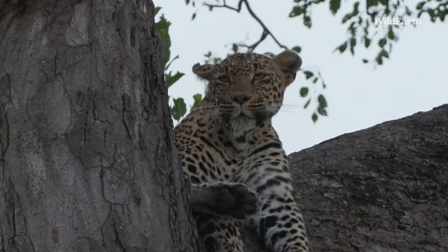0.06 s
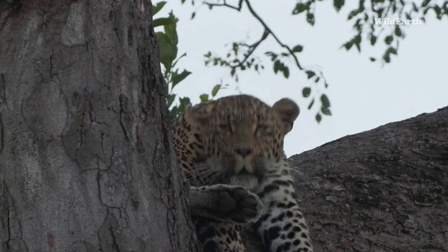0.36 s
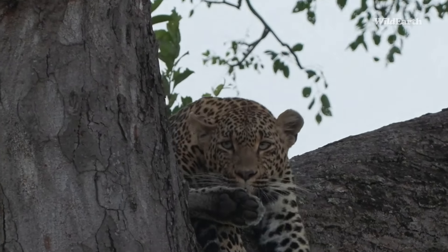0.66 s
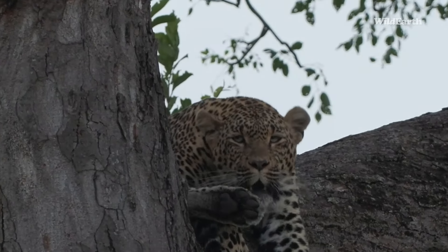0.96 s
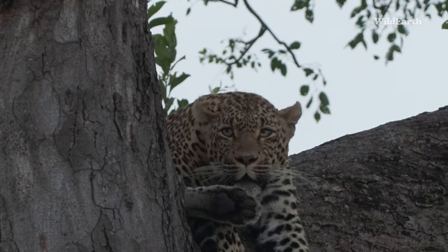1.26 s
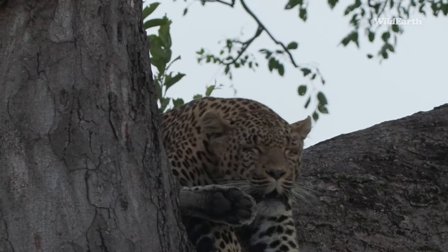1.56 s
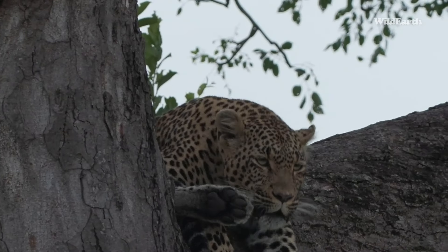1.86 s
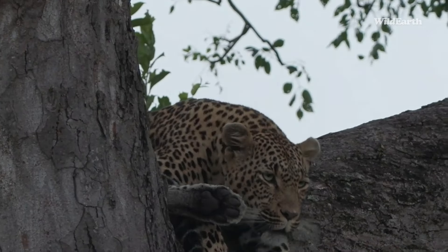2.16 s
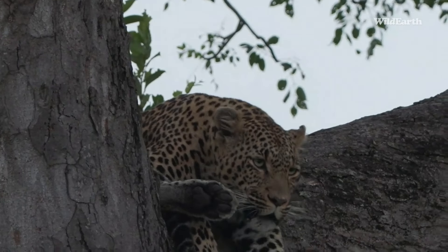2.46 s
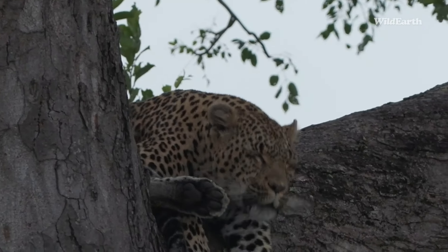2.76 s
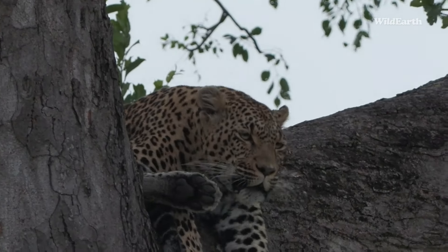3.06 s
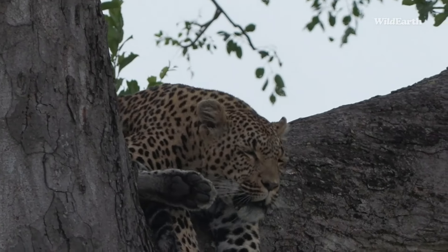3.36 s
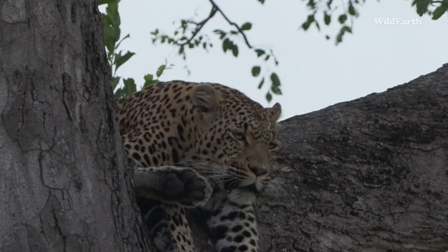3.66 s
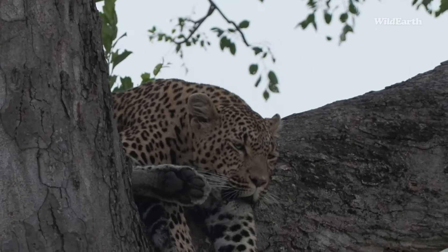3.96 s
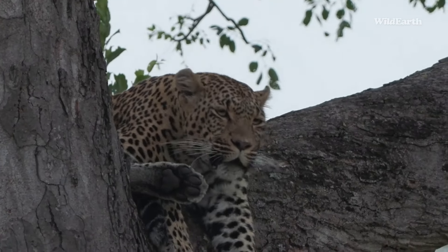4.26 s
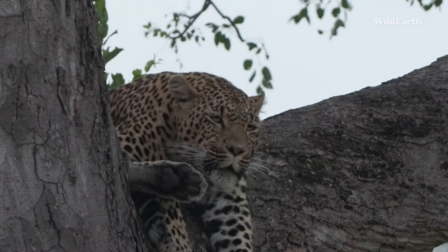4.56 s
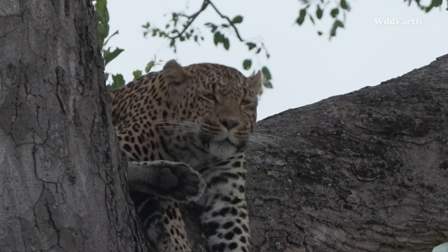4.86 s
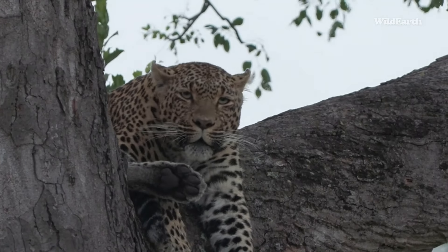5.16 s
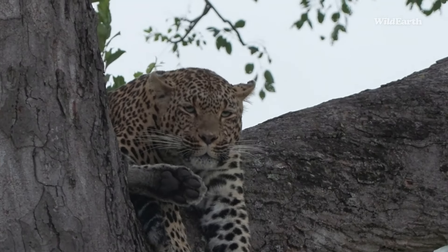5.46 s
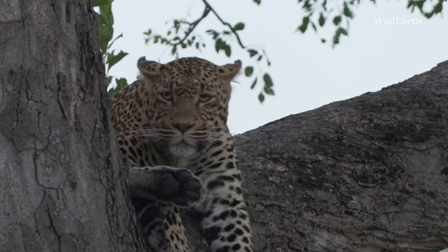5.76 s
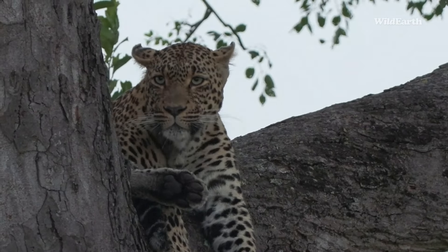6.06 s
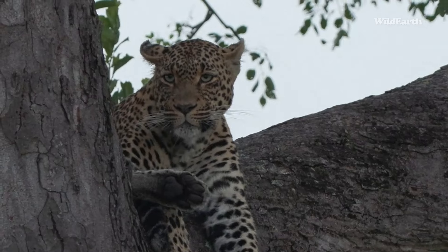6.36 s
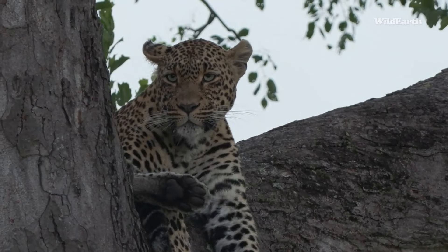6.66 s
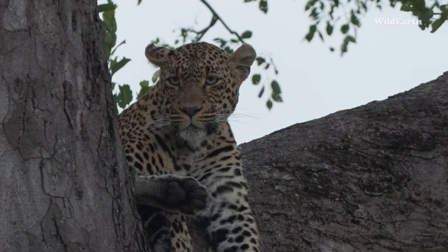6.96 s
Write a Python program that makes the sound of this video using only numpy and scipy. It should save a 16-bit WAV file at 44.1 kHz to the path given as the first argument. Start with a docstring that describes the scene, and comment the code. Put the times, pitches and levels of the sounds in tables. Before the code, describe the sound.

A leopard calls with harsh, sawing grunts and rasping in-breaths, then stops, leaving faint birds and twig ticks.

```python
"""A few twigs tick, then a leopard saws from a tree: harsh outward grunts alternate with softer inward rasps.
Its slack vocal folds flap some 20-60 times a second; each flap rings the throat and frees a puff of air.
As the effort peaks the ring sustains itself and overloads the microphone; a far bird starts to trill.
A weak last grunt ends before 6 s, leaving faint birds and twig ticks in the open-air hush."""
import sys
import numpy as np
from scipy import signal
from scipy.fft import rfft, irfft
from scipy.io import wavfile
from scipy.ndimage import uniform_filter1d, map_coordinates

SR = 44100
rng = np.random.default_rng(int(sys.argv[2]) if len(sys.argv) > 2 else 0)


def file_out(sig):
    """Save sig as 16-bit WAV at sys.argv[1]."""
    # one column per channel
    cols = np.atleast_2d(sig).T
    # limit, then scale
    lim = np.clip(cols, -1, 1)
    pcm = np.round(lim * 32767).astype(np.int16)
    wavfile.write(sys.argv[1], SR, pcm)


N = 309582


def leopard():
    """Flow-induced vibration: breath drives the vocal folds outward and inward in turn."""
    # exhalations: start_s, end_s, crest_after_s, strength_db, onset_softness, swell_db_per_s,
    # release_db_per_s, ring_hz, sustain_share, start_flap_hz, crest_flap_hz, release_flap_hz
    out_strokes = [(.346, .647, .06, -24.5, .45, 30, 124, 222, .39, 38.5, 41.5, 36),
                   (.902, 1.224, .153, -8, .42, 66, 315, 252, .98, 52, 47, 23.5),
                   (1.495, 1.797, .146, 0, .62, 6, 272, 242, .97, 50, 57, 32.5),
                   (2.102, 2.395, .138, -1.8, 1.05, 26, 290, 246, .66, 48, 53, 37),
                   (2.703, 3.009, .145, .6, 1.25, 22, 305, 243, .72, 41, 59, 32.5),
                   (3.33, 3.626, .138, .5, .78, 8, 305, 242, .97, 44, 61, 31),
                   (3.99, 4.295, .126, .7, .95, 26, 305, 228, .85, 39, 56, 37),
                   (4.664, 4.966, .133, -1, 1.08, 26, 315, 218, .85, 35, 57, 29.5),
                   (5.4, 5.65, .09, -18.5, .5, 0, 255, 194, .28, 37, 34, 23.5)]
    # inhalations: start_s, end_s, strength_db, crest_share, start_flap_hz, middle_flap_hz, end_flap_hz
    in_strokes = [(.73, .866, -13, .5, 31, 26.5, 45), (1.255, 1.485, -.7, .52, 22, 37, 32),
                  (1.865, 2.091, 1, .5, 27, 30, 37), (2.463, 2.68, 1, .68, 31, 28, 38),
                  (3.073, 3.316, 1, .6, 28, 29.5, 25), (3.693, 3.968, 1, .62, 24, 32, 27),
                  (4.349, 4.641, -1, .62, 29, 30.5, 44), (5.077, 5.37, -3, .62, 30, 24.5, 30)]
    out = np.zeros(N)
    for stroke in out_strokes:
        add(out, *grunt(stroke))
    for stroke in in_strokes:
        add(out, *rasp(stroke))
    return out


def grunt(stroke, hold_from_s=.0487, hold_past_s=.03, lag_s=.007, slowing_s=.07, sag_per_s=.58):
    """Self-sustained oscillation: loose flaps build to a held ring, then slow as the breath ebbs."""
    # resonances of throat and mouth: centre_hz, width_hz, height_db
    formants = [(538.4, 45, 9.5), (704.8, 88, 15.5), (759, 34, 13), (939, 70, 12.5), (1212, 80, 13.5),
                (1550, 150, 13.5), (1932, 270, 6), (2183, 32, 11), (2540, 130, 5), (2730, 360, 2),
                (2978, 43, 11), (3927, 300, 1.5), (6320, 600, 6), (8700, 910, 5)]
    # spectrum of the outward airflow: frequency_hz, level_db
    slope = [(30, -5.5), (120, -10.5), (270, -2), (400, -6.5), (520, -3), (1000, -14), (2000, -14.5),
             (3300, -12.5), (5400, -25.5), (8000, -32.5), (11000, -39), (15500, -45)]
    # envelopes of ring, throat air and hiss: relative_db, strength_factor, swell_factor,
    # onset_drop_db, attack_s, hold_s, release_factor, burst_db
    ring_shape = (-10.6, 1.0, 1.0, 28, .028, .016, 1.0, 0)
    throat_shape = (-23, .96, .55, 33, .016, .023, 1.0, 2.5)
    hiss_shape = (-35, .83, 1.3, 22, .018, .018, .64, 7.5)
    start, end, crest, strength_db, softness, swell, release, ring_hz, sustain, *rates = stroke
    t = np.arange(round((end - start) * SR)) / SR
    flap, age, left = fold_flaps(np.interp(t, [0, crest, crest + slowing_s], rates), jitter=.01)
    inside_hold_s = np.minimum(t - hold_from_s, crest + hold_past_s - t)
    held = sustain * np.clip(inside_hold_s / .0073 + .5, 0, 1)
    # a loose flap spends the pressure that opened it, so the level moves in steps
    stepped_t = t + (1 - held) * (lag_s - age)
    ring_db, throat_db, hiss_db = (grunt_level(stepped_t, crest, strength_db, softness, swell, release, shape)
                                   for shape in (ring_shape, throat_shape, hiss_shape))
    # the opening mouth lifts the ring and the formants
    opening = np.exp(-((stepped_t - .11) / .052) ** 2)
    hz = ring_hz * (1 - sag_per_s * t) * (1 + .175 * gain_of(strength_db) * opening)
    mouth = .925 + .15 * opening
    throats = [vocal_tract(slope, formants, mouth[flap == k].mean(), stray=.012, stray_db=3)
               for k in range(flap[-1] + 1)]
    strain = np.interp(t, [crest - .035, crest], [.38, 1])  # the jolts harden toward the crest
    tone = throat_ring(flap, age, left, hz, rise_s=.0078, close_s=.0019, uneven_db=1,
                       held=held, slip=.1 * strain, dip=.9 * strain)
    blast = np.clip((hiss_db + 53) / 14, 0, 1)  # a strong stream keeps the folds from closing
    rush = air_puffs(flap, age, throats, throat_db, hiss_db, puff_s=.0055 * (1 + .5 * blast),
                     leak=.09 + .2 * blast, snap=3.1, uneven_db=4.5, flutter=.15)
    fade = np.minimum((end - start - t) / .014, 1)
    return start, (gain_of(ring_db + 1.5) * tone + gain_of(-2.01) * rush) * fade


def rasp(stroke, ring_hz=214):
    """Pulsed excitation on inward flow: one firm flap, then slow, uneven ones over a steadier hiss."""
    # resonances of throat and mouth: centre_hz, width_hz, height_db
    formants = [(684.5, 34, 11), (744.8, 57, 19), (1197, 37, 16.6), (1815, 98, 13.8), (2243, 100, 13),
                (2547, 96, 10), (3157, 170, 7), (4400, 500, 4.5), (6035, 860, 6.9), (8300, 1300, 4.2),
                (3790, 92, 4), (6400, 150, 5.1)]
    # spectrum of the inward airflow: frequency_hz, level_db
    slope = [(30, -9), (120, 4), (250, 12.5), (420, -4.5), (1000, -18), (1500, -20.5), (3500, -27.5),
             (5400, -33.5), (8000, -37), (11000, -44.5), (15500, -49)]
    start, end, strength_db, crest, *rates = stroke
    t = np.arange(round((end - start) * SR)) / SR
    share = t / t[-1]
    ring_db = strength_db - 27.8 - rasp_drop(share, crest, start_db=26, end_db=13)
    throat_db = strength_db - 40.2 - rasp_drop(share, crest, start_db=23, end_db=20)
    hiss_db = strength_db - 50.7 - rasp_drop(share, crest, start_db=14, end_db=18)
    catch = gain_of(-34 + strength_db / 2) * np.exp(-(t / .024) ** 2)  # folds catch as the flow turns
    flap, age, left = fold_flaps(np.interp(share, [0, .5, 1], rates), jitter=.018)
    throats = [vocal_tract(slope, formants, 1, stray=.025, stray_db=3.5) for _ in range(flap[-1] + 1)]
    tone = throat_ring(flap, age, left, np.full(len(t), ring_hz), rise_s=.0092, close_s=.0016, uneven_db=4.5)
    rush = air_puffs(flap, age, throats, throat_db, hiss_db,
                     puff_s=.009, leak=.38, snap=2, uneven_db=3.5, flutter=.39)
    return start, ((gain_of(ring_db) + catch) * tone + rush) * signal.windows.tukey(len(t), .03)


def grunt_level(t, crest, strength_db, softness, swell, release, shape):
    """Amplitude envelope in dB: attack, swell, a burst at the crest, hold and exponential decay."""
    full_db, follows, swells, onset_db, attack_s, hold_s, falls, burst_db = shape
    attack = softness * onset_db * np.exp(-np.maximum(t, 0) / attack_s)
    body = follows * strength_db - swells * swell * np.maximum(crest - t, 0)
    burst = burst_db * gain_of(strength_db / 4) * np.exp(-((t - crest) / .022) ** 2)
    decay = falls * release * np.maximum(t - crest - hold_s, 0)
    return full_db + body - attack + burst - decay


def rasp_drop(share, crest, start_db, end_db):
    """Arched amplitude envelope, in dB below the crest: a slow rise and a quicker fall."""
    before = np.maximum(1 - share / crest, 0)
    after = np.maximum(share - crest, 0) / (1 - crest)
    return start_db * before ** 1.35 + end_db * after ** 2.1


def fold_flaps(rate_hz, jitter):
    """Quasi-periodic vibration: each sample's flap number, seconds into that flap and seconds left."""
    turns = np.cumsum(rate_hz * (1 + jitter * wobble(len(rate_hz), 40))) / SR
    return turns.astype(int), turns % 1 / rate_hz, (1 - turns % 1) / rate_hz


def throat_ring(flap, age, left, hz, rise_s, close_s, uneven_db, held=0, slip=0, dip=0):
    """Resonance: each flap swells and damps the throat's lowest mode; held, it rings on, only jolted."""
    size, jolt = (2 * rng.random((60, 2)) - 1)[flap].T
    closing = 1 - np.exp(-(left / close_s) ** 2)
    swell = (age / rise_s * np.exp(1 - age / rise_s)) ** 2 * closing * gain_of(uneven_db * size)
    turns = np.cumsum(hz * (1 + .027 * wobble(len(hz), 71.2))) / SR
    turns_in_flap = turns - turns[np.searchsorted(flap, flap)]
    kicked = swell * np.sin(2 * np.pi * turns_in_flap * (1 + .058 * jolt))
    phase_slips = uniform_filter1d(slip * jolt, size=160)
    dips = dip * np.exp(-(age / .0079) ** 2) * (1 - np.exp(-age / .001))
    sustained = (1 - dips) * np.sin(2 * np.pi * (turns + phase_slips))
    sound = (1 - held) * steadied(kicked, kicked) + held * unit_rms(sustained)
    # the throat radiates little away from its mode
    sound = signal.sosfiltfilt(signal.butter(2, [134, 440], "band", fs=SR, output="sos"), sound)
    return steadied(sound, sound)


def air_puffs(flap, age, throats, throat_db, hiss_db, puff_s, leak, snap, uneven_db, flutter):
    """Source and filter: each flap's knock and turbulent puff, over a steady leak, excite the throat."""
    size = gain_of(uneven_db * (2 * rng.random(60) - 1))[flap]
    flow = (leak + size * np.exp(-age / puff_s)) * np.exp(flutter * wobble(len(age), 500))
    knock = signal.lfilter([1], [1, -.5], np.diff(flap, prepend=-1) > 0)  # soft folds: little treble
    drive = flow * rng.standard_normal(len(age)) + snap * size * knock
    sound = np.zeros(len(age))
    for k in np.unique(flap):
        add(sound, np.argmax(flap == k) / SR, signal.fftconvolve(drive[flap == k], throats[k]))
    low, high = band(sound, 20, 1600), band(sound, 1600, 20000)
    throat_air = gain_of(throat_db) * steadied(low, band(low, 450, 1400))
    hiss = gain_of(hiss_db) * steadied(high, band(high, 1800, 9000))
    return throat_air + hiss


def vocal_tract(slope, formants, mouth, stray, stray_db):
    """Formant filter: the impulse response for one flap; soft tissue never holds quite the same shape."""
    hz = np.fft.rfftfreq(2048, 1 / SR)
    chance = rng.standard_normal((len(formants), 2))
    db = curve_at(slope, hz)
    for (centre_hz, width_hz, height_db), (shift, lift) in zip(formants, chance):
        detuning = 2 * (hz - centre_hz * mouth * (1 + stray * shift)) / width_hz
        db += (height_db + stray_db * lift) / (1 + detuning ** 2)
    log_gain = np.log(gain_of(np.r_[db, db[-2:0:-1]]))
    minimum_phase = np.exp(np.conj(signal.hilbert(log_gain)))
    return np.fft.ifft(minimum_phase).real[:1024]


def twigs(decay_s=.0022, trim_db=-6):
    """Damped transients: each dry tick is a noise burst that decays exponentially."""
    # twig ticks: start_s, relative_db, centre_hz
    ticks = [(.094, -51.5, 1280), (.181, -58, 4220), (.286, -50, 1000), (5.802, -45, 1260),
             (5.833, -46, 940), (5.887, -48.5, 906), (6.105, -51, 1790), (6.389, -51.5, 2500),
             (6.714, -46.5, 4050), (6.773, -36.5, 945), (6.914, -44, 3460)]
    out, t = np.zeros(N), np.arange(1024) / SR
    for start, db, hz in ticks:
        add(out, start, gain_of(db + trim_db) * noise_peak(len(t), hz, width_hz=2400) * np.exp(-t / decay_s))
    return out


def birds(trill_hz=4060, climb_hz=150, throb_hz=41, trill_s=.25):
    """Modulated tones make the climbing trills, whistles and pips; narrow-band noise makes the buzzes."""
    # a far bird's trills: start_s, relative_db
    trills = [(1.68, -75), (2.4, -70), (3.14, -71), (3.838, -68), (4.542, -70.5), (5.27, -68), (5.88, -71),
              (6.63, -71)]
    # thin whistles of small birds: start_s, length_s, start_hz, end_hz, relative_db
    whistles = [(6.141, .05, 2580, 2500, -73), (6.271, .09, 1900, 1890, -75),
                (6.361, .05, 2620, 2490, -70.5), (6.39, .064, 2750, 2980, -79),
                (6.472, .096, 1880, 1804, -76), (6.531, .069, 2560, 2450, -74),
                (6.698, .07, 2620, 2540, -76), (6.937, .065, 2620, 2370, -74)]
    # buzzy calls: start_s, length_s, centre_hz, width_hz, relative_db
    buzzes = [(0.525, .125, 8950, 1700, -67.5), (6.126, 0.15, 4800, 797, -81)]
    out, t = np.zeros(N), np.arange(int(trill_s * SR)) / SR
    throb = np.sin(2 * np.pi * throb_hz * t)
    for start, db in trills:
        hz = trill_hz + climb_hz * t / trill_s + 70 * throb + 140 * wobble(len(t), 900)
        trill = sine(hz) * (1 + throb / 2) * signal.windows.tukey(len(t), .8)
        add(out, start, gain_of(db) * unit_rms(trill))
    pips = [(4.995 + k * .26, .07, 7390, 7390, -85) for k in range(8)]  # columns as for whistles
    for start, seconds, start_hz, end_hz, db in pips + list(whistles):
        size = int(seconds * SR)
        hz = np.linspace(start_hz, end_hz, size) * (1 + .0063 * wobble(size, 270))
        add(out, start, gain_of(db) * unit_rms(sine(hz) * np.hanning(size)))
    for start, seconds, hz, width_hz, db in buzzes:
        size = int(seconds * SR)
        buzz = noise_peak(size, hz, width_hz) * signal.windows.tukey(size, .7)
        add(out, start, gain_of(db) * unit_rms(buzz))
    return out


def woods(x):
    """Reverberation by scattering: echoes from trunks and leaves, each band dying at its own rate."""
    # decay among the trees: frequency_hz, t60_s
    decay_times = [(150, 0.74), (700, 0.67), (3000, 0.61), (8000, 0.68), (15000, 0.36)]
    echoes = rng.standard_normal(SR) * (rng.random(SR) < .05) * (np.arange(SR) / SR > .012)
    hz, t, spectra = signal.stft(echoes, SR, nperseg=256)
    decay = gain_of(-60 * t / curve_at(decay_times, hz)[:, None])
    tail = signal.istft(spectra * decay, SR, nperseg=256)[1]
    return signal.fftconvolve(x, tail / np.linalg.norm(tail))[:N]


def hush():
    """Ambient noise: a soft broadband hush of open air whose level drifts."""
    # spectrum of the hush: frequency_hz, density_db
    spectrum = [(15, -38), (25, -7.5), (75, -1), (359, -6), (552, -6.5), (1270, -13.5), (1380, -17),
                (1850, -13.5), (2770, -19.5), (4150, -18.5), (5010, -23.5), (9050, -29), (15500, -33)]
    # its course: time_s, level_db
    levels = [(0, -71), (.7, -72.5), (1.501, -61), (3, -62.5), (5.699, -64), (7.02, -64.5)]
    colour = gain_of(curve_at(spectrum, np.fft.rfftfreq(N, 1 / SR)))
    noise = irfft(rfft(rng.standard_normal(N)) * colour, N)
    level_db = np.interp(np.arange(N) / SR, *np.transpose(levels)) + .6 * wobble(N, 7.2)
    return unit_rms(noise) * gain_of(level_db)


def gain_of(db):
    """Decibels to amplitude."""
    return 10 ** (np.asarray(db) / 20)


def unit_rms(x):
    """Normalisation to rms 1."""
    return x / np.sqrt(np.mean(x ** 2) + 1e-20)


def steadied(x, part):
    """Running normalisation: divides x by the rms of the given part over a flap or two."""
    window = signal.windows.hann(2800)
    weight = signal.fftconvolve(np.ones(len(x)), window, "same")
    power = signal.fftconvolve(part ** 2, window, "same") / weight
    return x / np.sqrt(abs(power) + 1e-20)


def curve_at(points, hz):
    """Interpolation on a log-frequency axis."""
    f, value = np.transpose(points)
    return np.interp(np.log(hz + 1), np.log(f + 1), value)


def add(mix, start_s, sound):
    """Superposition of a sound on the mix."""
    part = mix[round(start_s * SR):][:len(sound)]
    part += sound[:len(part)]


def band(x, lo_hz, hi_hz):
    """Band-pass filter."""
    return signal.sosfilt(signal.butter(3, [lo_hz, hi_hz], "band", fs=SR, output="sos"), x)


def sine(hz):
    """A tone whose phase is the integral of its frequency."""
    return np.sin(2 * np.pi * np.cumsum(hz) / SR)


def wobble(size, hz):
    """Smooth random modulation of rms near 1, changing about hz times a second."""
    knots = rng.standard_normal(size // 20 + 9)
    return map_coordinates(knots, [np.arange(size) / (SR / hz)], order=3, mode="wrap")


def noise_peak(size, hz, width_hz):
    """Noise shaped by one resonance peak."""
    detuning = (np.fft.rfftfreq(size, 1 / SR) - hz) / (width_hz / 2)
    return unit_rms(irfft(rfft(rng.standard_normal(size)) / (1 + detuning ** 2), size))


def scene():
    """Direct and scattered sound: the near cat is almost dry, its treble echoing most; far birds are wet."""
    cat, calls = leopard(), birds()
    scattered = gain_of(-35) * cat + gain_of(-27.5) * band(cat, 600, 14000) + gain_of(-6) * calls
    return (cat + gain_of(-1) * calls + woods(scattered) + twigs() + hush())[None]


def record(dry, ceiling=.32, knee=7.9, lean=.012, low_cut_hz=30, high_cut_hz=15720):
    """Asymmetric saturation: the microphone rounds off the loudest swings; filters then limit the band."""
    limit = ceiling + lean * np.sign(dry)
    clipped = dry / (1 + abs(dry / limit) ** knee) ** (1 / knee)
    coupled = signal.lfilter(*signal.butter(1, low_cut_hz, "high", fs=SR), clipped)
    low_pass = signal.firwin(511, high_cut_hz, window=("kaiser", 9), fs=SR)
    return signal.oaconvolve(coupled, low_pass[None], "same")


dry = scene()
out = record(dry)
file_out(out)
```